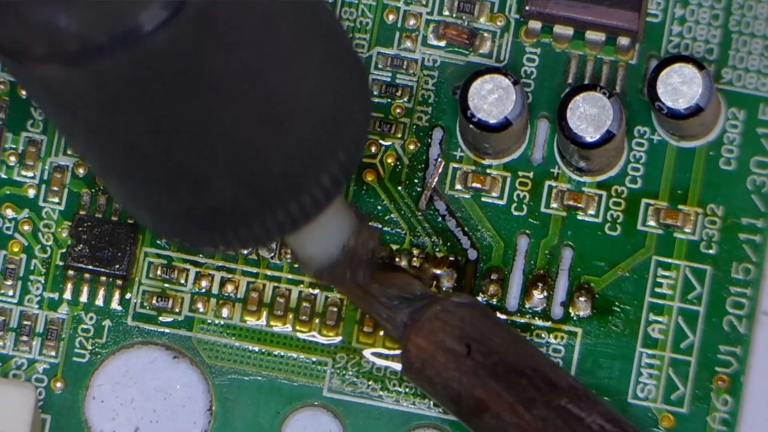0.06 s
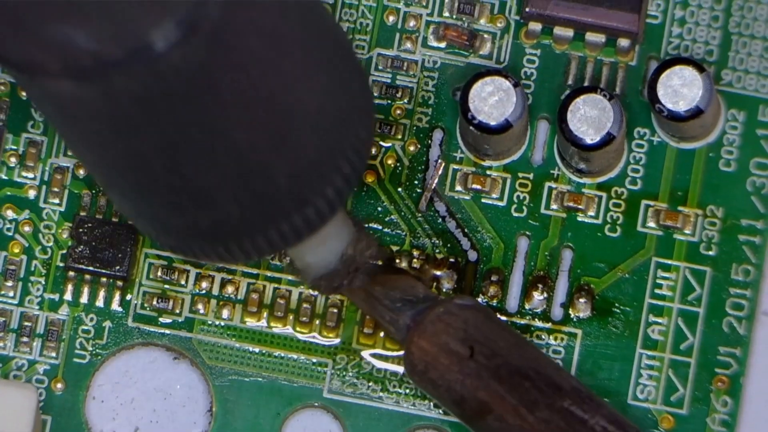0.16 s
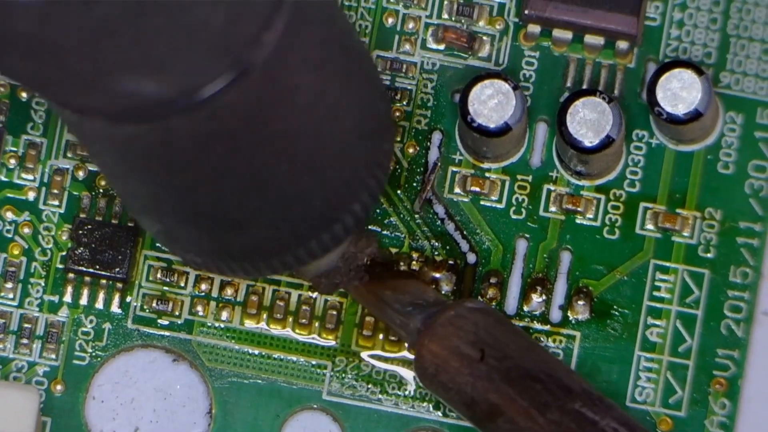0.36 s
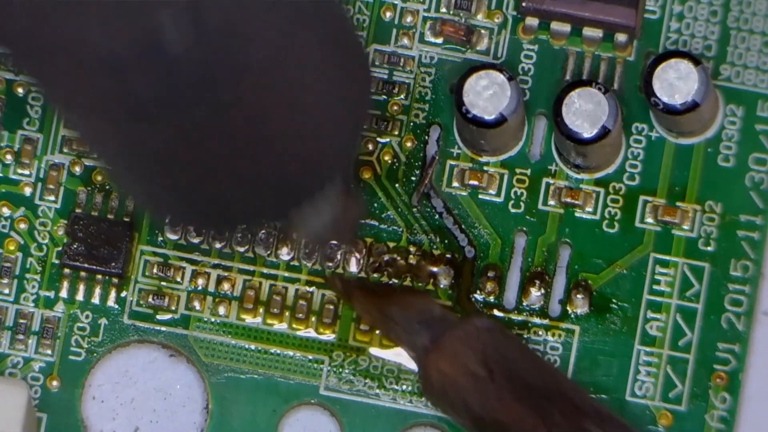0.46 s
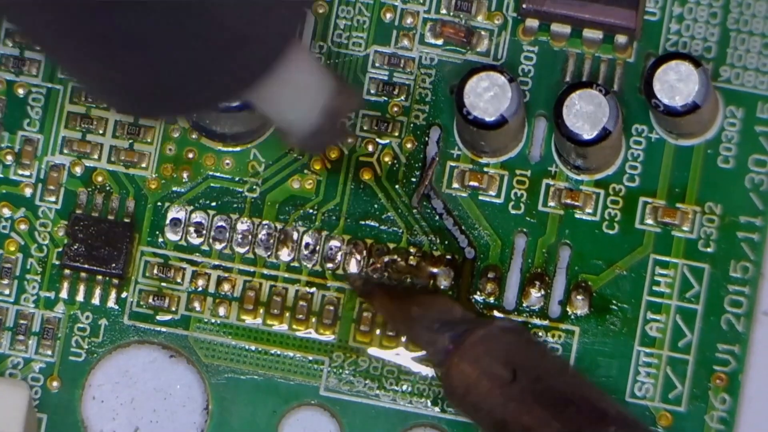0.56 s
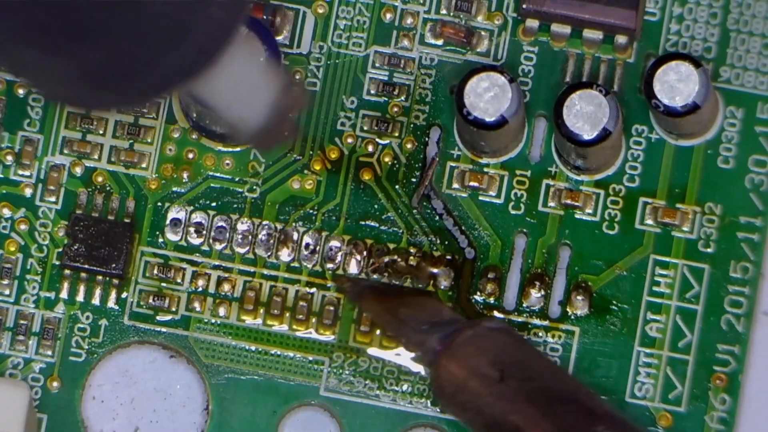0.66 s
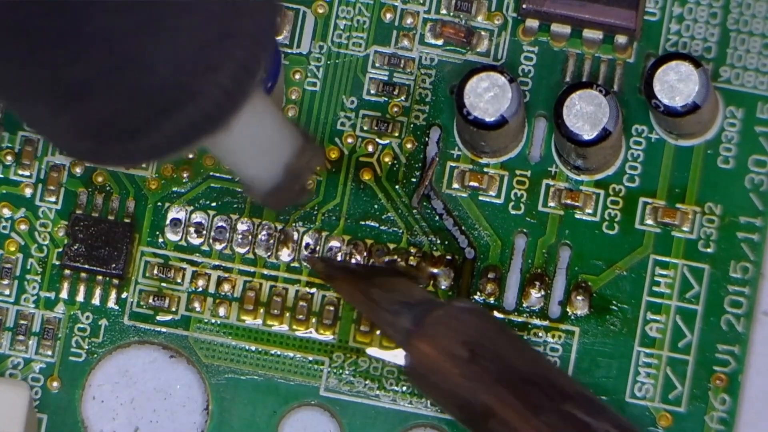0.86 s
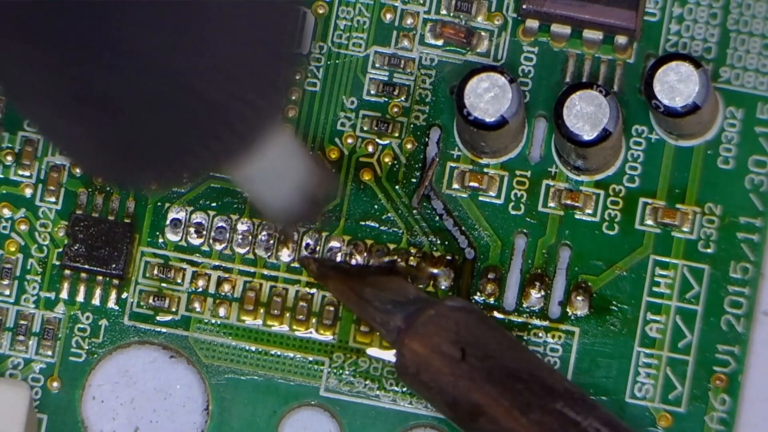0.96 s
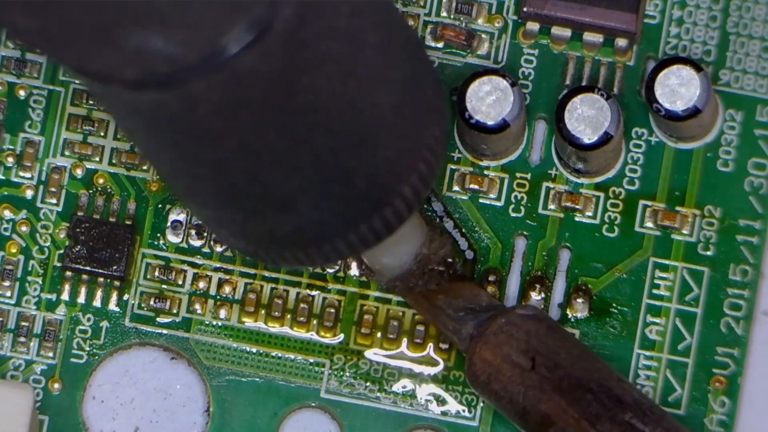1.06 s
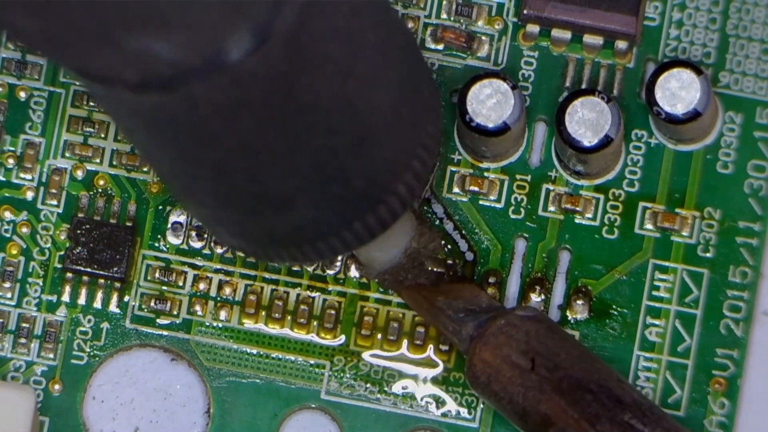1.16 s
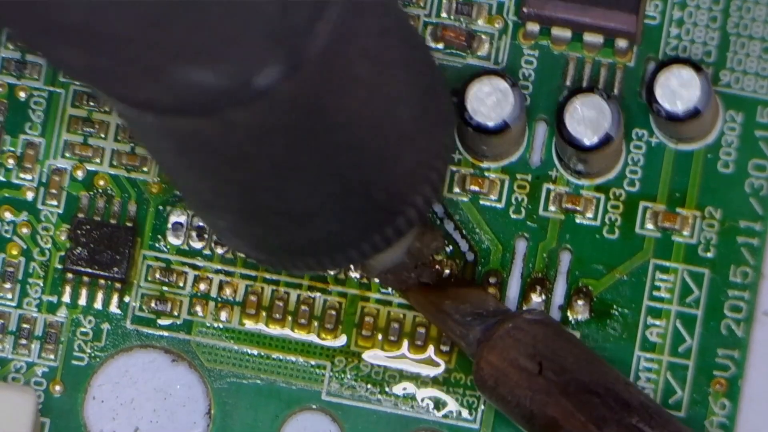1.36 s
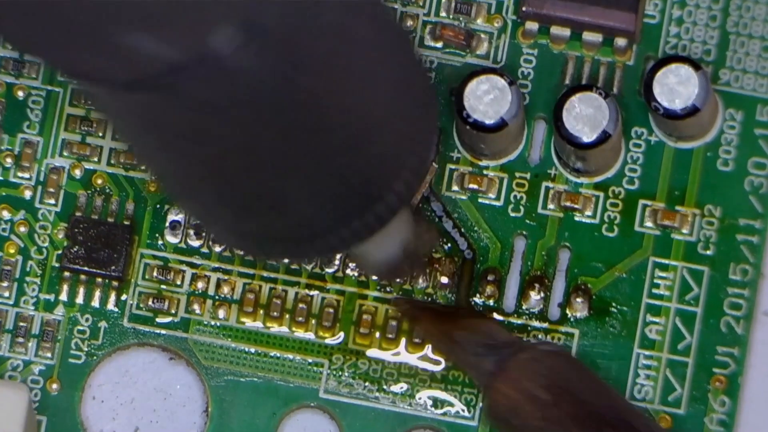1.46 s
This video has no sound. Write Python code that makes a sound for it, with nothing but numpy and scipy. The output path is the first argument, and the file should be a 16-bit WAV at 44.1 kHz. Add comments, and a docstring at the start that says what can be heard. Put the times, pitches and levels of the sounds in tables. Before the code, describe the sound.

A spring-loaded solder sucker works close up on a bench in a small room. At 0.2 s it fires: sharp plastic crack, brief air rush, low thump, rapid rebounds and a fading spring buzz. From 0.64 s the plunger rubs with a faint squeak, latching at 0.8 s with a bright, ringing click; a duller click follows at 0.9 s. It fires again at 1.2 s, over faint ventilation and hiss.

```python
"""A spring-loaded solder sucker fires with a snap and a gasp of air, is cocked, and fires again on a bench.
Each shot: damped modes of the barrel sound as the catch lets go and the piston stops; shaped noise makes
the rush of air and the thump, and a swinging spring hums. Between shots, rubbing noise with a squeak makes
the plunger slide, and a ringing click latches it before a duller click knocks back against the catch.
Light ticks surround the actions, a small room answers, and ventilation and hiss run steadily beneath."""
import sys
import numpy as np
from scipy import signal
from scipy.fft import rfft, irfft
from scipy.io import wavfile
from scipy.ndimage import uniform_filter1d

SR = 44100
rng = np.random.default_rng(int(sys.argv[2]) if len(sys.argv) > 2 else 0)


def transcribe(u):
    """Save the signal u as a 16-bit wav file named by the first command-line argument.

    u: samples, shape (n,) or (channels, n), limited to [-1, 1]; the rate is SR.
    q: integer samples, one column per channel.
    """
    v = np.clip(np.atleast_2d(u).T, -1, 1)
    q = np.round(v * 32767).astype(np.int16)
    wavfile.write(sys.argv[1], SR, q)


N = 66150  # samples: 1.5 s

# Damped modes of the plastic barrel: frequency_hz, level_db, t60_s
BARREL_MODES = [(2550, -4.5, 0.018), (2773, -4, 0.013), (2915, -4, .028), (3115, -26.5, 0.047),
                (4500, -16, 0.041)]
# Resonances of the air in the barrel: frequency_hz, level_db, t60_s
AIR_MODES = [(1575, -6.5, 0.056), (1654, -5, 0.045), (1807, -12.5, 0.014), (284, -19.5, 0.06)]
# Relative spectrum of air rushing through the nozzle: frequency_hz, density_db (per Hz)
RUSH_SPECTRUM = [(100, -6), (900, -13), (2000, -15), (2800, 3.5), (3700, -18), (4500, -9), (5600, -16.5),
                 (7500, -3.5), (8700, -3.5), (10000, 0), (11800, -1.5), (13600, 1), (15000, 1),
                 (16000, -3.5)]
# Relative spectrum of plastic contact: frequency_hz, density_db (per Hz)
CRACK_SPECTRUM = [(100, -24.5), (1200, -15.5), (2500, 11), (4500, -2.5), (6500, -0.5), (10000, 0.5),
                  (14000, 4), (16000, -2.5)]
CRACK_T60_S = 0.017
SMALL_PARTS_LOW_HZ = 1840


def amp(db):
    """Level to amplitude: 20 dB is a factor of ten."""
    return 10 ** (np.asarray(db) / 20)


def unit(x):
    """Normalization by the root mean square, to rms 1."""
    return x / np.sqrt(np.mean(x ** 2) + 1e-20)


def read(points, hz, axis=1):
    """Linear interpolation of a table column along log frequency."""
    table = np.array(points, float)
    return np.interp(np.log(hz + 1), np.log(table[:, 0] + 1), table[:, axis])


def clock():
    """Time axis: seconds since a sound began."""
    return np.arange(N) / SR


def fade(t60):
    """Exponential decay: 60 dB lost in t60 seconds."""
    return amp(-60 * clock() / t60)


def swell(rise, hold, t60):
    """Envelope of a driven source: quadratic attack, hold and exponential release (seconds)."""
    t = clock()
    attack = np.minimum(t / rise, 1) ** 2
    release = amp(-60 * np.maximum(t - rise - hold, 0) / t60)
    return attack * release


def add(mix, start_s, sound):
    """Superposition: adds a sound to the mix from its start time."""
    part = mix[max(round(start_s * SR), 0):]
    part += sound[:len(part)]


def filtered_noise(gain):
    """Spectral shaping: white noise weighted by a gain per frequency bin, then set to rms 1."""
    return unit(irfft(rfft(rng.standard_normal(N)) * gain, N))


def noise(spectrum):
    """Coloured noise: random phases under the spectrum of a table."""
    return filtered_noise(amp(read(spectrum, np.fft.rfftfreq(N, 1 / SR))))


def ring(modes):
    """Modal synthesis: a sum of damped sines that start together, as after one blow."""
    return sum(amp(db) * fade(t60) * np.sin(2 * np.pi * hz * clock()) for hz, db, t60 in modes)


def crack(t60):
    """Impact noise: plastic contact excites a broad, decaying burst."""
    return noise(CRACK_SPECTRUM) * fade(t60)


def thin(x, hz):
    """Radiation of small parts: they radiate little bass, hence a high-pass filter."""
    return signal.sosfilt(signal.butter(4, hz, "highpass", fs=SR, output="sos"), x)


def background():
    """Stationary noise: ventilation and hiss keep a constant spectrum."""
    # frequency_hz, density_db (per Hz, relative)
    floor_spectrum = [(20, -11.5), (42, 3), (70, -9), (105, -1), (150, -1.5), (250, -2.5), (430, 0.5),
                      (700, -5.5), (1400, -7.5), (2000, -18.5), (2600, -18), (4000, -27.5), (8000, -29),
                      (12000, -28), (15000, -26)]
    return amp(-49.5) * noise(floor_spectrum)


def ticks():
    """Impact excitation: light ticks of plunger and thumb set off the barrel and its air."""
    # start_s, crack_db, crack_t60_s, barrel_db, air_db
    tick_events = [(0.1900, -47, 0.022, -42, -61.5), (0.3905, -43, 0.036, -50, -37),
                   (0.4019, -38, 0.022, -44, -41), (0.6408, -39, 0.016, -36.5, -57),
                   (0.6539, -46, .035, -46.5, -40), (0.6752, -54, .03, -55, -54.5),
                   (0.803, -27.5, 0.062, -46.5, -60), (0.899, -26, 0.014, -34, -49.5),
                   (1.1730, -49, 0.018, -47, -46.5), (1.3700, -44, 0.034, -63, -68)]
    out = np.zeros(N)
    for start_s, crack_db, t60, barrel_db, air_db in tick_events:
        body = amp(barrel_db) * ring(BARREL_MODES) + amp(air_db) * ring(AIR_MODES)
        add(out, start_s, amp(crack_db) * crack(t60) + body)
    return out


def release_and_stop(s, stop_db, scrape_s, scrape_db):
    """Friction, then impact: the catch scrapes and lets go, and the piston strikes its stop."""
    release_db, release_crack_db = -13.5, -18.5  # the crack is relative to the release
    stop_delay_s, stop_crack_db = .0128, -10.5
    out = np.zeros(N)
    scrape = noise(CRACK_SPECTRUM) * swell(scrape_s / 2, scrape_s / 2, 0.018)
    add(out, s - scrape_s, amp(scrape_db) * scrape)
    release = ring(BARREL_MODES) + amp(release_crack_db) * crack(CRACK_T60_S)
    add(out, s, amp(release_db) * release)
    stop = amp(stop_db) * ring(BARREL_MODES) + amp(stop_crack_db) * crack(CRACK_T60_S)
    add(out, s + stop_delay_s, stop)
    return thin(out, SMALL_PARTS_LOW_HZ)


def air_rush():
    """Turbulence: air drawn through the narrow nozzle makes broadband noise."""
    return amp(-13) * noise(RUSH_SPECTRUM) * swell(rise=0.0054, hold=0.0095, t60=0.07)


def recoil():
    """Reaction force: the recoil of the pump thumps on the board as low noise."""
    # frequency_hz, density_db (per Hz, relative)
    thump_spectrum = [(20, -21.5), (45, -13.5), (100, -10.5), (170, 1), (280, 3), (480, -4), (800, 0.5),
                      (1200, -8), (2000, -8.5), (4000, -13.5), (16000, -47)]
    return amp(-26) * noise(thump_spectrum) * swell(rise=0.0016, hold=0.02, t60=0.21)


def gulp():
    """Sudden flow: solder breaks through the nozzle in a short burst of air noise."""
    return amp(-13.5) * noise(RUSH_SPECTRUM) * fade(.014)


def coil_and_board():
    """Free vibration: the released spring and the circuit board ring from the first rebound on."""
    # Lasting modes of the freed spring: frequency_hz, level_db, t60_s
    coil_modes = [(1562, -35.5, 0.26), (1664, -34.5, 0.26), (1660, -39, 0.46), (1830, -35.5, 0.19),
                  (1367, -49.5, 0.51)]
    # Bending modes of the circuit board: frequency_hz, level_db, t60_s
    board_modes = [(43, -34.5, 0.34), (165.6, -36, 0.25)]
    return ring(coil_modes) + ring(board_modes)


def spring_hum(hold_s, rattle_db):
    """Damped oscillation: the freed spring swings, and its rattle swells once a cycle."""
    # Overtones of the swing: frequency_hz, level_db
    hum_overtones = [(228, -9), (280, -11), (339, -12)]
    # Relative spectrum of the coil rattling in the barrel: frequency_hz, density_db (per Hz)
    buzz_spectrum = [(100, -30.5), (900, -14.5), (1300, 3), (1650, -8), (2000, -1.5), (2500, -5),
                     (3500, -14), (6000, -17.5), (16000, -45.5)]
    hum_hz, sag_db_per_s = 93.8, 35
    t = clock()
    swing = np.sin(2 * np.pi * hum_hz * t)
    # each overtone starts at a random phase
    overtones = sum(amp(db) * np.sin(2 * np.pi * (hz * t + rng.random())) for hz, db in hum_overtones)
    buzz = amp(rattle_db) * noise(buzz_spectrum) * (1 + .5 * swing)
    # the sag adds to the decay of the release
    level = swell(0.0026, hold_s, 0.14) * amp(-sag_db_per_s * t)
    fundamental = level * (swing + buzz * fade(0.94))
    return np.sqrt(2) * (fundamental + overtones * swell(0.0054, 0.0091, 0.21))


def sway():
    """Slow build-up of a resonance: the pump keeps swaying faintly."""
    # frequency_hz, level_db, t60_s (of the release)
    sway_modes = [(92.6, -46, 0.6)]
    rise_s = 0.22
    return sum(amp(db) * np.sin(2 * np.pi * hz * clock()) * swell(rise_s, rise_s / 2, t60)
               for hz, db, t60 in sway_modes)


def shot(s, db, stop_db, rebound_db, rattle_db, hum_s, scrape_s, scrape_db):
    """Stored elastic energy released: contact, air flow, rebounds and spring hum in succession."""
    # Piston rebounds: delay_s (after the release), level_db (relative)
    rebounds = [(.0225, -2), (.033, -4), (.036, 0)]
    gulp_delay_s, hum_delay_s, hum_db = 0.0041, 0.027, -31.5
    out = release_and_stop(s, stop_db, scrape_s, scrape_db)
    add(out, s, amp(db) * air_rush())
    add(out, s, recoil())
    for delay_s, bounce_db in rebounds:
        add(out, s + delay_s, amp(rebound_db + bounce_db) * ring(AIR_MODES))
    add(out, s + gulp_delay_s, gulp())
    first_rebound_s = rebounds[0][0]
    add(out, s + first_rebound_s, amp(db) * coil_and_board())
    add(out, s + hum_delay_s, amp(hum_db) * spring_hum(hum_s, rattle_db))
    add(out, s + hum_delay_s, sway())
    return out


def plunger_slide():
    """Dry friction: the piston seal rubs with irregular grip and squeaks early in the stroke."""
    # Relative spectrum of the rubbing seal: frequency_hz, density_db (per Hz)
    slide_spectrum = [(300, -23), (1600, 2.5), (3200, 1), (4300, 1), (5300, 4), (6300, -2), (9000, 2),
                      (12500, 3.5), (14800, 7.5), (16000, 3)]
    # Course of the rubbing as the plunger goes down: time_s, level_db
    push_course = [(0.639, -49.5), (.68, -48), (.715, -51), (.75, -47.5), (.772, -49.5), (0.787, -53)]
    # Relative spectrum of the squeak: frequency_hz, density_db (per Hz)
    squeak_spectrum = [(100, -60), (4300, -30), (5000, -6), (5300, 0), (5600, -6), (6400, -30),
                       (16000, -50)]
    squeak_start_s, squeak_hold_s, squeak_db = .668, .06, -56
    grip_db = 2.6  # rms of the irregular level
    when, level = np.transpose(push_course)
    push = np.interp(clock(), when, amp(level), left=0, right=0)
    wander = unit(uniform_filter1d(rng.standard_normal(N), size=300))
    out = push * amp(grip_db * wander) * noise(slide_spectrum)
    squeak = noise(squeak_spectrum) * swell(.006, squeak_hold_s, .1)
    add(out, squeak_start_s, amp(squeak_db) * squeak)
    return out


def spring_shimmer(spring_hz):
    """Dense resonances: clusters of modes shimmer in the compressed spring and coils chatter."""
    # Clusters of coil modes: ratio (to the ring pitch), level_db, width_hz (at half amplitude)
    coil_clusters = [(.61, -2, 220), (.96, 2, 600), (1.07, -1.5, 700), (1.28, -9, 500)]
    # Relative spectrum of coils chattering on the barrel: frequency_hz, density_db (per Hz)
    rattle_spectrum = [(1800, -22), (2900, -6), (3400, -1), (5200, 0), (6500, -9), (9000, -4), (11000, -6),
                       (13300, -1), (16000, -9)]
    hz = np.fft.rfftfreq(N, 1 / SR)
    clusters = sum(amp(level) / (1 + (2 * (hz - ratio * spring_hz) / width) ** 2)
                   for ratio, level, width in coil_clusters)
    shimmer = filtered_noise(clusters) * fade(0.26)
    rattle = amp(-2) * noise(rattle_spectrum) * fade(.28)
    return shimmer + rattle


def latch(s, db, crack_db, lead_s, lead_db, spring_db, spring_hz, knock_db):
    """Impact on a notch: the catch scrapes, clicks and sets the compressed spring ringing."""
    # Modes of the catch: frequency_hz, level_db, t60_s
    catch_modes = [(2523, -7.5, 0.016), (2578, -30, 0.031), (4040, -4, 0.01), (4450, -14.5, 0.011),
                   (5300, -18, .009), (9750, -8.5, 0.0069), (10100, -8, 0.0035), (12970, -14.5, 0.017),
                   (13800, -31, 0.012)]
    out = np.zeros(N)
    add(out, s - lead_s, amp(lead_db) * noise(RUSH_SPECTRUM) * swell(0.00061, lead_s, 0.025))
    add(out, s, amp(db) * (ring(catch_modes) + amp(crack_db) * crack(CRACK_T60_S)))
    add(out, s, amp(spring_db) * spring_shimmer(spring_hz))
    out = thin(thin(out, SMALL_PARTS_LOW_HZ), SMALL_PARTS_LOW_HZ)
    add(out, s, amp(knock_db) * ring([(455, 0, .04)]))  # knock on the hand: Hz, dB, t60 in s
    return out


def room(x):
    """Reverberation: dense reflections from bench and walls, each band with its own decay time."""
    # frequency_hz, level_db, t60_s
    room_bands = [(98, -12, 0.86), (396, -10, 0.89), (920, -16.5, 1), (1680, -10, 0.53),
                  (2900, -16.5, 0.46), (4100, -9.5, 0.46), (6950, -9, .31), (9700, -13.5, 0.3),
                  (14500, -10.5, 0.23)]
    hz, t, bands = signal.stft(rng.standard_normal(N), SR, nperseg=256)
    t60 = read(room_bands, hz, axis=2)[:, None]
    decay = amp(read(room_bands, hz)[:, None] - 60 * t / t60)
    # makes the energy of a band independent of its decay time
    energy_scale = np.sqrt(np.log(1e6) / (t60 * SR))
    tail = signal.istft(bands * decay * energy_scale, SR, nperseg=256)[1][:N]
    tail = tail * np.minimum(clock() / 0.0015, 1)  # reflections build up over 1.5 ms
    return signal.fftconvolve(x, tail)[:N]


def scene():
    """Superposition: direct sounds, their reverberation and steady noise, alike in both channels."""
    # start_s (release), level_db (rush, coil and board), stop_db, rebound_db,
    # rattle_db (relative to the hum), hum_s (hold), scrape_s (before the release), scrape_db
    shot_events = [(0.2119, 0.5, -6, -13, -3, 0.095, 0.021, -36.5),
                   (1.19, -1, -24, -18, -13.5, 0.081, 0.0067, -34.5)]
    # start_s, level_db, crack_db (relative to the click), lead_s, lead_db,
    # spring_db, spring_hz, knock_db
    latch_events = [(0.7933, -2, -10.5, .003, -20, -34.5, 4300, -71),
                    (0.8947, -13.5, -8, .0045, -33.5, -39, 4710, -32.5)]
    sounds = [shot(*row) for row in shot_events]
    sounds += [latch(*row) for row in latch_events]
    sounds.append(plunger_slide() + ticks())
    mono = sum(sound + room(sound) for sound in sounds) + background()
    return np.array([mono, mono])


def record(dry):
    """Saturation and band limiting: peaks bend softly below a ceiling, then a low-pass filter."""
    ceiling, edge_hz = 1.05, 15850
    limited = dry / (1 + (dry / ceiling) ** 4) ** .25
    lowpass = signal.firwin(401, edge_hz, window=("kaiser", 9), fs=SR)
    return signal.oaconvolve(limited, lowpass[None], "same")


dry = scene()
out = record(dry)
transcribe(out)
```